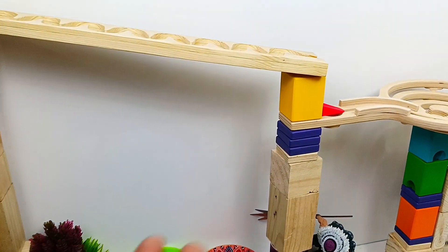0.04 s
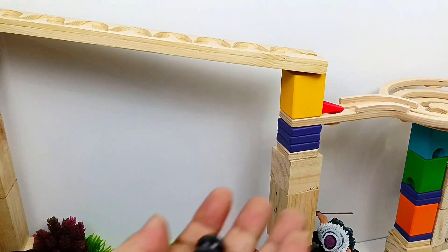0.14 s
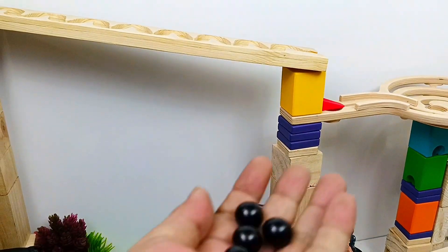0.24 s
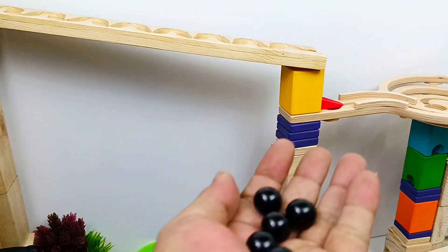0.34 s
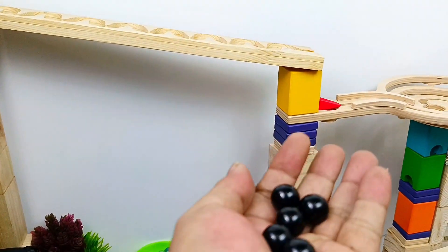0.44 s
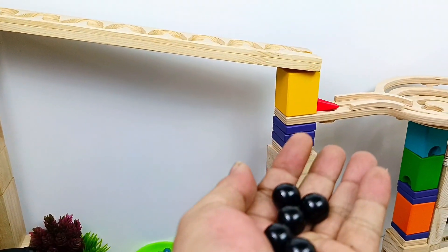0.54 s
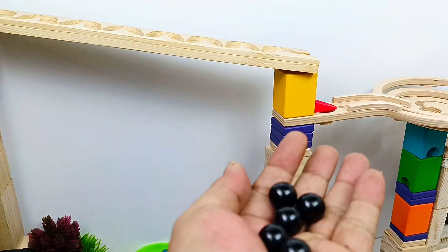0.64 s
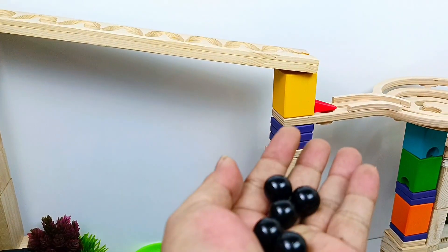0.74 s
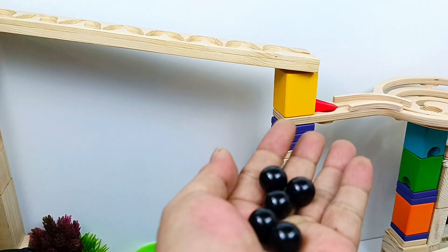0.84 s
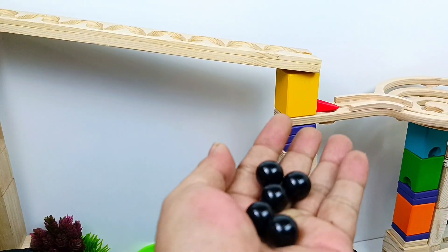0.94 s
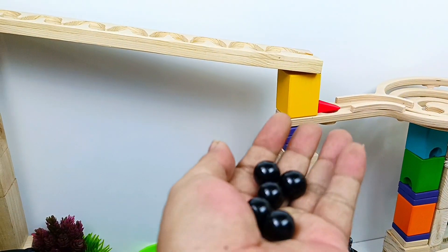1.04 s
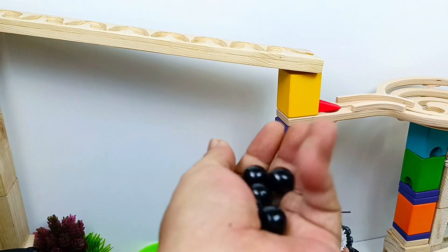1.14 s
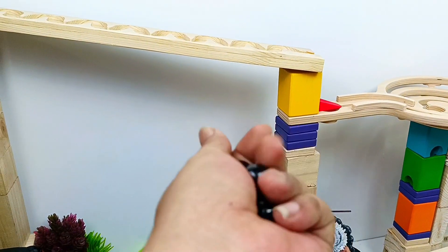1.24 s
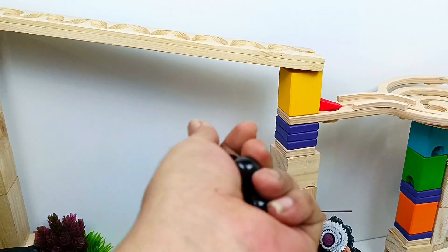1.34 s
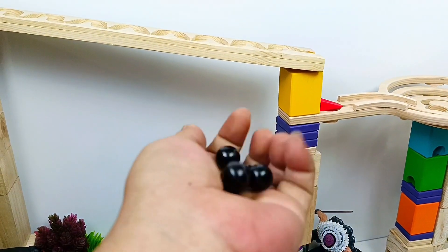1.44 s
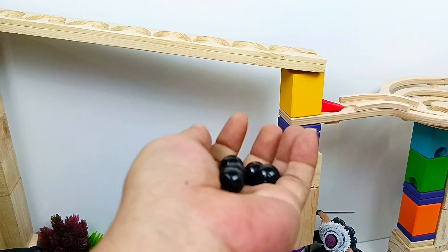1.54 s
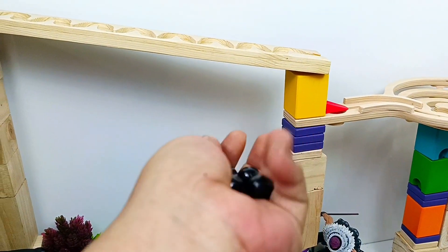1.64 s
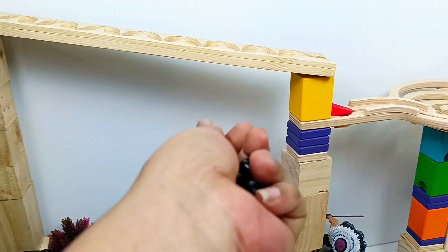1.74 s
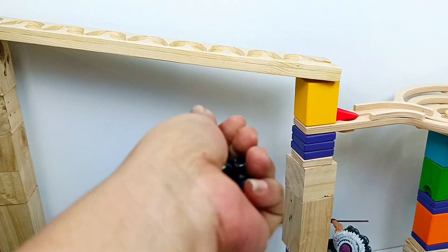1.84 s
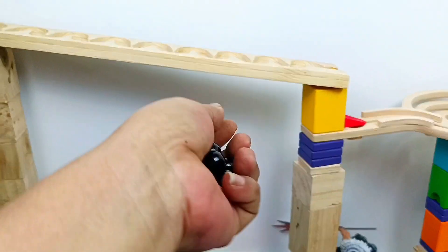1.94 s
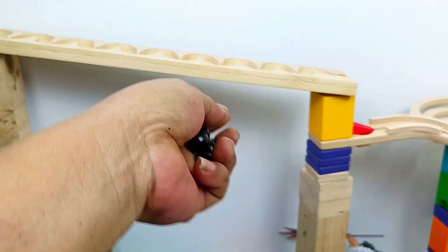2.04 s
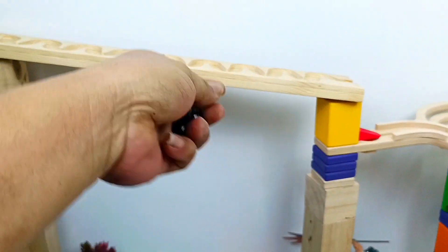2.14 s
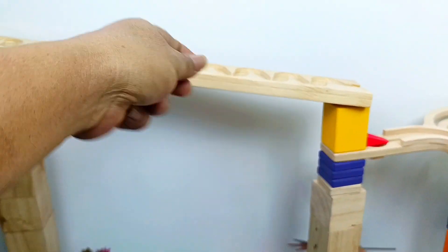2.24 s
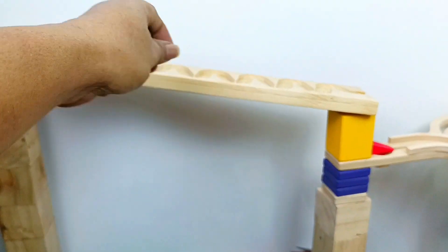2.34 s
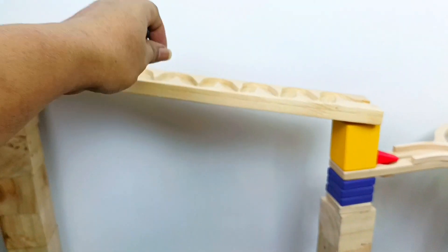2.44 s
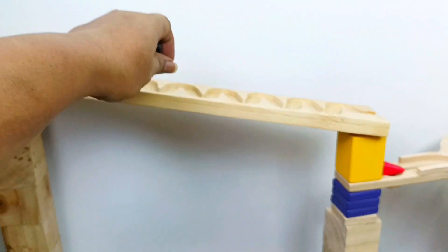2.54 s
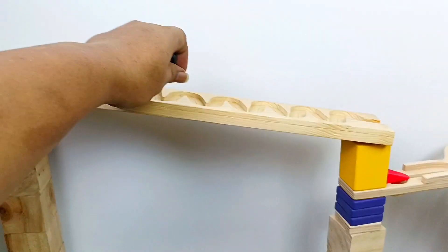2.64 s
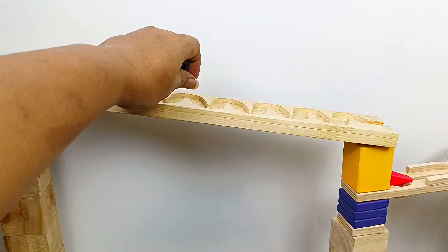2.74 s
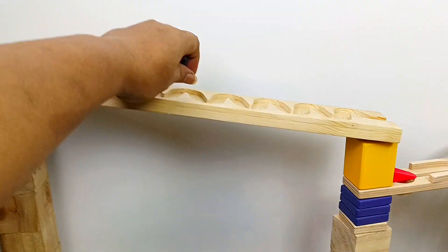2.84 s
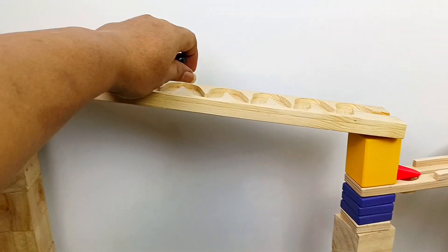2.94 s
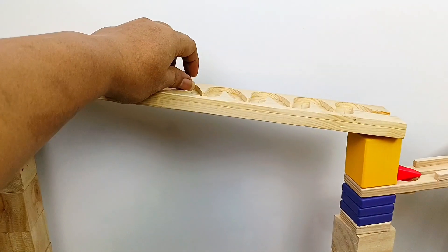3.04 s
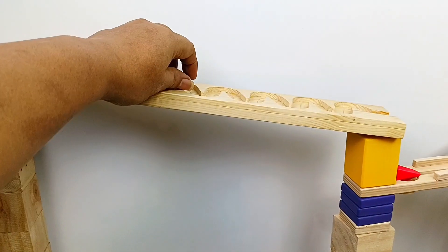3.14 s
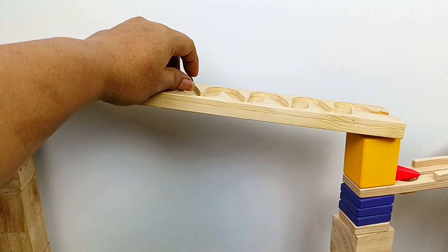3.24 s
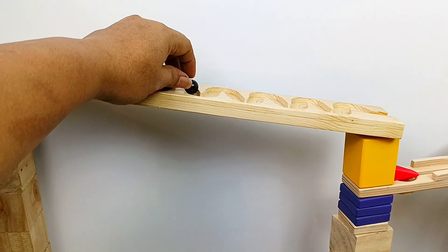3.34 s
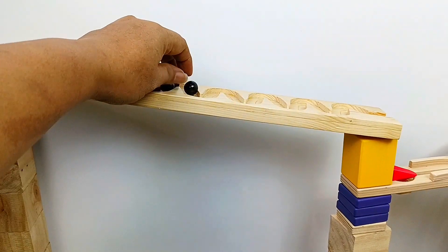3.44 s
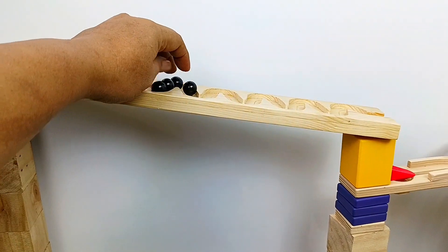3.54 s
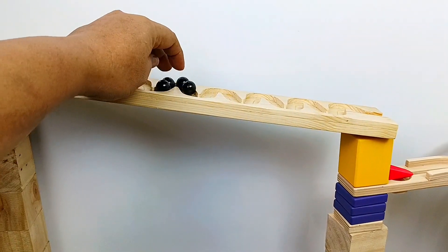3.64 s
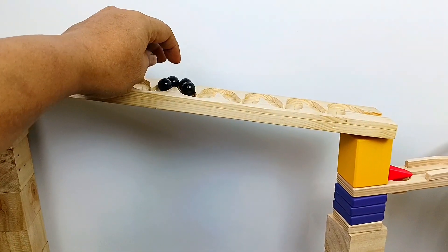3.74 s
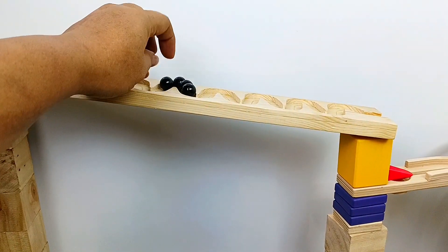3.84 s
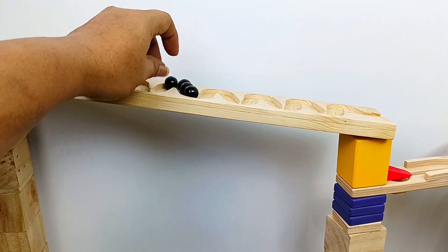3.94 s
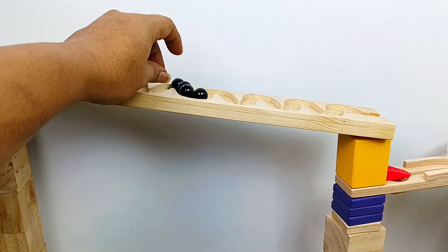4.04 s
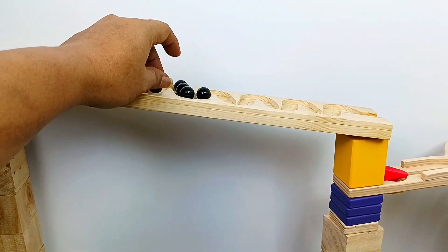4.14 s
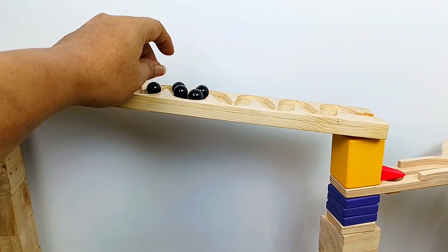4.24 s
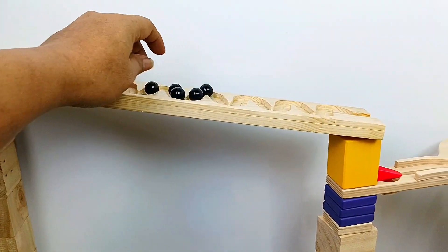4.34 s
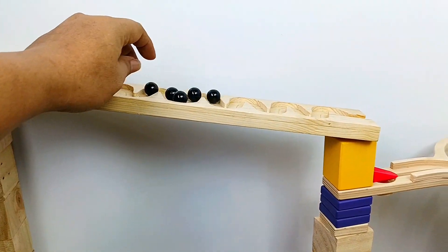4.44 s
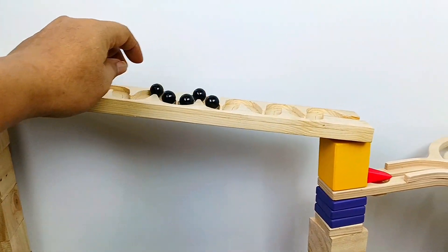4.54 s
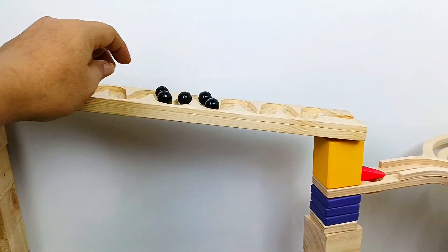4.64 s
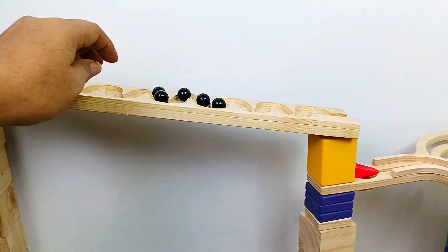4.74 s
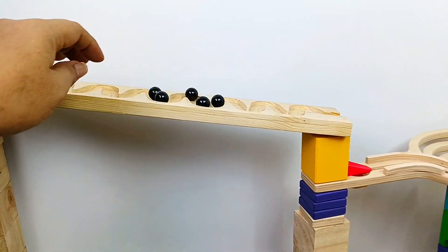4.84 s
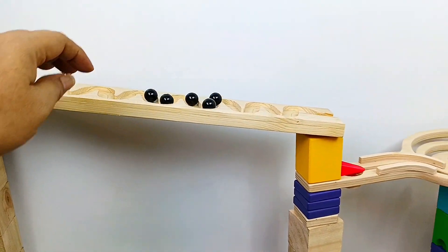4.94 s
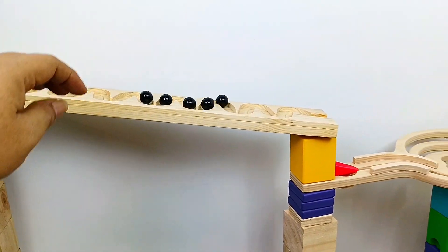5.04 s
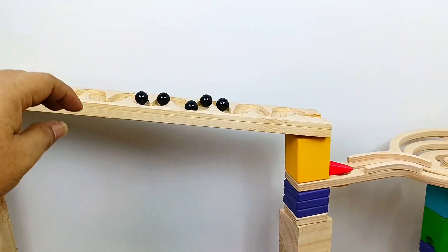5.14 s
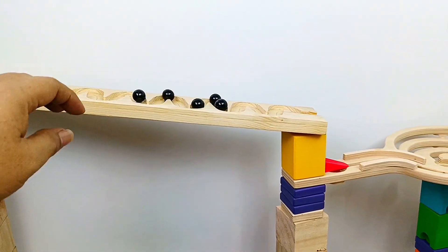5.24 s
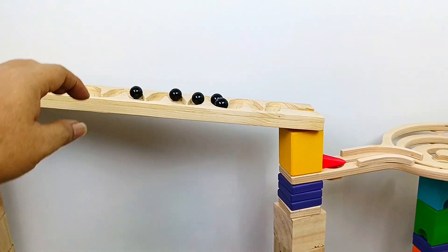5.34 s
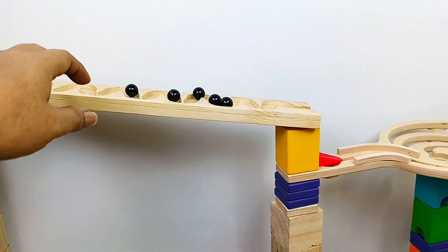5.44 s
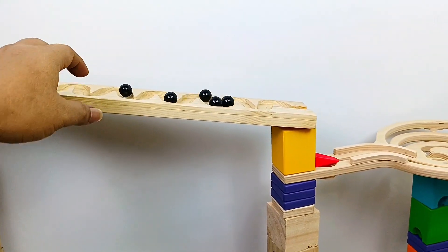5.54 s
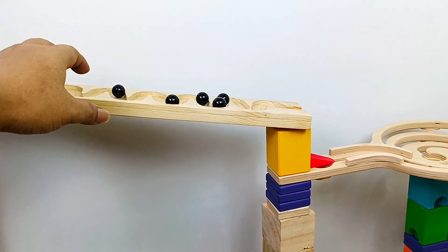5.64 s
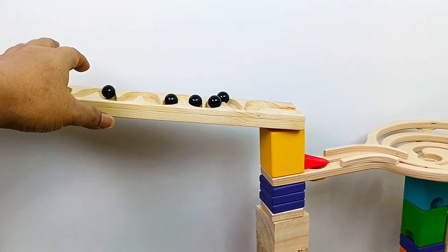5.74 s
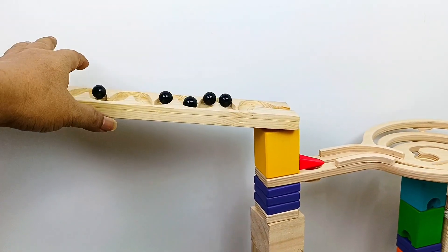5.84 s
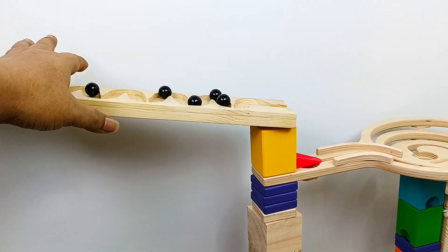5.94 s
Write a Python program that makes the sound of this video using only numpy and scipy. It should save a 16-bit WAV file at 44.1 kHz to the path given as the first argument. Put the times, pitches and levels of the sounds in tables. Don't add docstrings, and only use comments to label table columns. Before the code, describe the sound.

A quiet small room with faint, slightly uneven air hush, heard close through a handheld phone. Right at the start, hard glass marbles clack brightly together in a palm, a rapid burst dying within 0.15 s. A smaller patter follows at 0.43-0.62 s, then near quiet. At 1.4 s comes a sharp click with a few lighter ones; from 1.64 to 1.77 s the closing fingers make a crisp, dense rattle, trailing into sparse ticks until 2.1 s. A faint airy swell passes around 2.45 s. At 3.17 s the marbles spill onto a wooden ramp: a loud, hollow, ringing clatter, dense until 3.6 s, with a clear glass click at 3.84 s. Another cluster of woody knocks lands at 4.27 s, a duller one at 4.69 s, then irregular, mostly weakening taps and faint rolling over ridges continue to the end at 6 s. Soft low handling thumps come at 5.65 and 5.8 s.

```python
import sys
import numpy as np
from scipy import signal
from scipy.fft import rfft, irfft
from scipy.io import wavfile
from scipy.ndimage import uniform_filter1d

SR = 44100
rng = np.random.default_rng(int(sys.argv[2]) if len(sys.argv) > 2 else 0)


def inscribe(sig):
    pcm = np.round(np.clip(np.atleast_2d(sig).T, -1, 1) * 32767)
    wavfile.write(sys.argv[1], SR, pcm.astype(np.int16))


def voltage_ratio(decibels):
    exponent = np.asarray(decibels, float) / 20
    return 10 ** exponent


N = 263718

# start in seconds, peak in dB, hardness as treble in dB.
DROPS = [(3.1655, -22, -6), (3.1872, -22.5, -5.5), (3.1972, -24.5, -8), (3.238, -29, -2.5),
         (3.2495, -31.5, -4), (3.2795, -24, -4), (3.311, -31.5, 1), (3.3189, -32, -5.5), (3.3459, -30, -7),
         (3.3801, -26, -9), (3.4254, -25.5, -12), (3.4576, -38, -4), (3.4765, -26.5, -4),
         (3.5318, -29.5, -2), (3.5438, -27.5, -5.5), (3.5927, -26, -20), (3.6431, -40.5, -22),
         (3.7111, -52, -12), (3.7444, -33.5, -12), (3.7504, -33, -12), (3.7757, -32.5, -12),
         (3.9399, -38.5, -22), (3.9714, -38.5, -22)]
# start in seconds, peak in dB, hardness as treble in dB.
RIDGE_HITS = [(4.2697, -30, -7), (4.2891, -29.5, -4), (4.32, -33.5, -4.5), (4.3584, -41.5, -3),
              (4.398, -49.5, -4), (4.4364, -37, -17), (4.531, -50.5, -21), (4.566, -46, -1.5),
              (4.576, -43, -4), (4.669, -37, -15), (4.679, -40, -12), (4.6902, -33.5, -13),
              (4.6976, -29, -23.5), (4.8149, -39, -35), (4.949, -42.5, -8), (5.0486, -47, -18),
              (5.078, -47, -1), (5.102, -47.5, -7.5), (5.1459, -45, -15), (5.1873, -47, -21),
              (5.2282, -40.5, -19), (5.2345, -50, -4), (5.2536, -43.5, -18), (5.323, -36.5, -9.5),
              (5.3412, -41, -10), (5.3784, -51, -4), (5.422, -56, 4), (5.483, -45.5, -6.5),
              (5.5967, -42.5, -13), (5.619, -41.5, -5), (5.66, -44, -9), (5.6887, -51, -10),
              (5.7091, -49.5, -5), (5.74, -46.5, -13), (5.769, -56.5, -19), (5.8079, -44.5, -9.5),
              (5.8583, -52, -12), (5.907, -51, -12), (5.9238, -44, -15.5)]


def evened(x):
    return x / np.sqrt(np.mean(x ** 2) + 1e-20)


def read(points, hz):
    f, value = np.transpose(points)
    return np.interp(np.log(hz + 1), np.log(f + 1), value)


def over_time(points):
    return np.interp(np.arange(N) / SR, *np.transpose(points))


def follow(points):
    return voltage_ratio(np.interp(np.arange(N) / SR, *np.transpose(points), -150, -150))


def ring(x, hz, width):
    r = np.exp(-np.pi * width / SR)
    w = 2 * np.pi * hz / SR
    return signal.lfilter([0, np.sin(w)], [1, -2 * r * np.cos(w), r * r], x)


def colour(x, points):
    return irfft(rfft(x) * voltage_ratio(read(points, np.fft.rfftfreq(N, 1 / SR))), N)


def band(x, low_hz, high_hz, order=2):
    edges_hz = [low_hz, min(high_hz, .45 * SR)]
    return signal.sosfilt(signal.butter(order, edges_hz, "bp", fs=SR, output="sos"), x)


def grit(per_s, spread_db):
    sign = rng.choice([-1., 1.], N)
    size = rng.exponential(1, N)
    chance = rng.random(N)
    return sign * voltage_ratio(spread_db * np.minimum(size, 4)) * (chance < per_s / SR)


def wander(count, per_s):
    knots = rng.standard_normal((count, 200))
    return np.array([np.interp(np.arange(N) * per_s / SR, np.arange(200), k) for k in knots])


def patchy(x, patchy_db):
    z = signal.stft(x, nperseg=512)[2]
    patches = rng.standard_normal(z.shape[1:])
    patches = evened(uniform_filter1d(uniform_filter1d(patches, 5, 0), 8, 1))
    return signal.istft(z * voltage_ratio(patchy_db * patches), nperseg=512)[1][:, :N]


def hush():
    # time in seconds, level in dB.
    hush_level = [(0, -65), (.4, -64), (0.551, -67.5), (1.2, -65), (1.9, -67), (3.1, -63), (3.302, -65),
                  (4.5, -68.5), (5.98, -66.5)]
    # frequency in Hz, density in dB per Hz.
    hush_colour = [(15, -52.5), (25, -41.5), (55, -13.5), (77, -26), (135, -12.5), (280, -6), (422, -5.5),
                   (483, -8.5), (809, -10), (1510, -13), (2040, -8.5), (3700, -31), (4240, -24),
                   (5270, -39.5), (7710, -29.5), (15200, -50), (16500, -66.5)]
    # time in seconds, level in dB.
    draught_level = [
        (0.0, -57.5),
        (0.31, -60.5),
        (2.27, -60),
        (2.45, -54.5),
        (3.15, -63),
    ]
    # frequency in Hz, width in Hz, level in dB.
    hums = [
        (99, 19, -75.5),
        (161.4, 3.8, -79.5),
    ]
    # frequency in Hz, left-right coherence from 0 to 1.
    likeness = [(60, 0.92), (240, 0.94), (950, 0.93), (3770, 0.93), (15000, 0.99)]
    a, b = rfft(rng.standard_normal((2, N)))
    same = np.clip(read(likeness, np.fft.rfftfreq(N, 1 / SR)), -1, 1)
    pair = irfft([a, same * a + np.sqrt(1 - same ** 2) * b], N)
    air = evened(colour(pair, hush_colour)) * voltage_ratio(over_time(hush_level) + 4.5)
    draught = colour(pair[:, ::-1], [(900, -54.5), (1350, 0.0), (2200, -5.0), (2900, -9.0),
                                     (4500, -22.5), (9000, -42.5)])
    air += evened(draught) * follow(draught_level) * voltage_ratio(-2.5)
    hum = sum(voltage_ratio(db) * evened(ring(ring(pair, hz, w), hz, w)) for hz, w, db in hums)
    return patchy(air + hum, patchy_db=2) * voltage_ratio(.6 * wander(count=1, per_s=8.3))


def bumps():
    # start in seconds, level in dB, frequency in Hz, length in seconds.
    pushes = [
        (0.01, -60.5, 69.6, 0.17),
        (1.505, -63, 45, 0.051),
        (2.834, -50.5, 424.4, 0.13),
        (3.815, -55.5, 51.3, 0.15),
        (4.68, -54.5, 135, 0.053),
        (5.65, -37, 94.6, 0.013),
        (5.659, -42.5, 99, 0.03),
        (5.77, -38.5, 66.3, 0.035),
        (5.804, -38.5, 72, 0.023),
        (5.832, -57, 62.8, 0.15),
    ]
    out = np.zeros(N)
    for s, db, hz, length in pushes:
        t = np.arange(round(length * SR)) / SR
        push = voltage_ratio(db) * np.sin(2 * np.pi * hz * t) * np.hanning(len(t)) ** 1.48
        part = out[round(s * SR):][:len(t)]
        part += push[:len(part)]
    return out


def room(x, build_s=0.016):
    # frequency in Hz, reverberation time t60 in seconds.
    decay = [(300, 0.8), (1500, 1), (4000, 0.92), (8000, 0.69), (14000, 0.51)]
    taps = np.zeros((2, SR // 2))
    at = np.arange(60, SR // 2 - 20, 10) + rng.integers(0, 10, (2, (SR // 2 - 71) // 10))
    np.put_along_axis(taps, at, rng.choice([-1., 1.], at.shape), 1)
    taps = taps[0] + 0.4 * taps[1] * np.array([[1], [-1]])
    hz, t, z = signal.stft(taps, SR, nperseg=128)
    z = z * voltage_ratio(-60 * t / read(decay, hz)[:, None]) * (1 - 0.026 * np.exp(-t / build_s))
    tail = signal.istft(z, SR, nperseg=128)[1]
    return signal.fftconvolve(x[None], tail / np.linalg.norm(tail[0]), axes=1)[:, :N]


def shine(sway_db=5.0):
    # time in seconds, level in dB.
    shine_level = [(3.16, -75), (3.17, -53), (3.22, -55), (3.3, -55), (3.37, -65), (3.5, -60), (3.54, -62),
                   (3.65, -73), (3.74, -83), (4.265, -88), (4.275, -52), (4.33, -57), (4.42, -62),
                   (4.5, -82), (4.9, -80), (5.3, -77.5), (5.65, -77), (5.98, -82)]
    # frequency in Hz, width in Hz, level in dB.
    high_modes = [(3600, 100, 4), (3855, 90, 7.5), (4580, 100, -2), (4870, 93, -2), (5460, 170, -7),
                  (5860, 70, -2.5), (6830, 92, -17), (7340, 90, -9), (7900, 140, -3.5), (9280, 180, -29.5),
                  (10650, 250, -28)]
    grain = grit(per_s=2600, spread_db=2.5)
    sway = wander(count=len(high_modes), per_s=22)
    total = np.zeros(N)
    for k, (hz, w, db) in enumerate(high_modes):
        mode = ring(ring(grain, hz, w), hz, 1.5 * w)
        total += voltage_ratio(db + sway_db * sway[k]) * evened(mode)
    return follow(shine_level) * evened(total)


def sing():
    # time in seconds, level in dB.
    song_level = [(3.16, -64), (3.2, -38.5), (3.35, -46.5), (3.5, -48), (3.59, -34.5), (3.7, -56),
                  (3.85, -57.5), (4.2, -64.5), (4.3, -54), (4.55, -56), (4.8, -61), (5.1, -58),
                  (5.3, -59.5), (5.55, -58.5), (5.7, -60), (5.98, -56)]
    # frequency in Hz, width in Hz, level in dB.
    strong_modes = [(1295, 32, -1), (1371, 46, -2.5), (2064, 148, 1.5), (2858, 210, -5), (3870, 45, -19),
                    (4620, 63, -24.5), (381.5, 35, -11)]
    grain = grit(per_s=3000, spread_db=3.5)
    sway = wander(count=len(strong_modes), per_s=10)
    total = np.zeros(N)
    for k, (hz, w, db) in enumerate(strong_modes):
        mode = ring(ring(grain, hz, 1.4 * w), hz, 1.4 * w)
        total += voltage_ratio(db + 4.8 * sway[k]) * evened(mode)
    return follow(song_level) * evened(total)


def cracks(crack_db=-14, ridge_crack_db=-5.5, t60=0.049):
    s, db, treble_db = np.transpose([*DROPS, *RIDGE_HITS])
    on_ridge = np.arange(len(s)) >= len(DROPS)
    strikes = np.zeros(N)
    strikes[np.round(s * SR).astype(int)] = voltage_ratio(db + treble_db + crack_db + ridge_crack_db * on_ridge)
    level = signal.lfilter([1], [1, -voltage_ratio(-60 / (t60 * SR))], strikes)
    return colour(level * rng.standard_normal(N), [
        (1500, -27), (3300, 14), (5300, 1), (6300, -1), (6900, 3.5), (7400, -6), (8000, 2),
        (9000, -5), (15000, -15)])


def clinks(waver_db=4, wobble=1.0, rise_s=0.0013):
    # start in seconds, level in dB, frequency in Hz, decay time t60 in seconds.
    single_rings = [(1.308, -62, 5850, .2), (1.364, -46, 4290, .03), (1.397, -34, 2850, 0.02),
                    (1.4, -30.5, 3600, 0.014), (1.402, -53, 2750, .2), (1.403, -51, 3230, .1),
                    (1.431, -52, 2900, 0.24), (1.492, -36.5, 3990, 0.017), (1.571, -49, 4450, 0.039),
                    (1.824, -39, 3290, 0.032), (2.283, -53.5, 6220, .026), (2.287, -56, 5570, 0.027),
                    (2.292, -62, 5900, 0.036), (3.167, -43, 6830, .03), (3.24, -36, 456, 0.13),
                    (3.382, -23, 813, 0.045), (3.749, -33, 2275, 0.059), (3.752, -35.5, 1910, 0.059),
                    (3.753, -46, 5350, 0.046), (3.871, -50.5, 324, 0.071), (4.272, -46, 5570, .03),
                    (4.289, -48, 4850, .06), (4.29, -35.5, 2980, 0.1), (4.692, -54, 5540, 0.058),
                    (4.843, -43, 4510, .02), (4.952, -52, 4620, .05), (4.956, -54, 3900, 0.27),
                    (5.083, -62, 4600, 0.04), (5.236, -54, 4720, 0.064), (5.322, -52, 5490, .025),
                    (5.325, -59, 4950, 0.1), (5.326, -53, 3600, .05), (5.426, -56.5, 4400, 0.067),
                    (5.47, -50, 370, 0.11), (5.487, -63, 3920, 0.062), (5.619, -37, 3010, 0.032),
                    (5.62, -44.5, 3620, 0.055), (5.62, -54, 4600, .04), (5.69, -65, 5750, .05),
                    (5.81, -62, 3920, .08)]
    out = np.zeros(N)
    t = np.arange(SR // 4) / SR
    waver = wander(count=1, per_s=36)[0]
    for s, db, hz, t60 in single_rings:
        shake = waver[round(hz) * 25 + np.arange(len(t)) * 6] * np.minimum(t / .01, 1)
        level = voltage_ratio(db - 60 * t / t60 + waver_db * shake) * np.minimum(t / rise_s, 1)
        phase = 2 * np.pi * hz * t + wobble * min(hz / 2500, 1) * shake[::-1]
        part = out[round(s * SR):][:len(t)]
        part += (level * np.sin(phase))[:len(part)]
    return out


def ramp(knock_db=-12, roll_db=-38, place_db=4, drop_blow_s=.002, ridge_blow_s=.005):
    # frequency in Hz, level in dB, decay time t60 in seconds.
    plank_modes = [(244, -25, 0.081), (342, -21, 0.091), (385, -5, 0.06), (411.6, 0, 0.073),
                   (462.3, 1.5, 0.061), (625, -33, 0.036), (813, 6, 0.059), (1063, 6, 0.033),
                   (1243, -9, 0.076), (1294, -8, 0.14), (1369, -6.5, 0.098), (1387, -3.5, 0.043),
                   (1490, -6.5, 0.18), (1643, -8.5, 0.078), (1803, 2.5, 0.039), (2043, 7, 0.0095),
                   (1994, -4, 0.08), (2085, -1.5, 0.081), (2121, 1, 0.019), (2293, -3.5, 0.054),
                   (2338, -5.5, 0.098), (2444, -18, 0.05), (2493, -9, 0.076), (2570, -5.5, 0.029),
                   (2662, -7.5, 0.08), (2830, -7, 0.065), (2880, -4.5, 0.037), (2919, -6.5, 0.076),
                   (2960, -28, 0.029), (3470, 1, 0.022), (3608, 5, 0.039), (3857, 5.5, 0.033),
                   (3854, 1, 0.048), (4250, -8, 0.016), (4600, 5.5, 0.021), (4850, 1.5, 0.02),
                   (5400, -12, 0.025)]
    # time in seconds, level in dB.
    roll_level = [(3.162, -49), (3.2, -29.5), (3.3, -33), (3.37, -36), (3.46, -36.5), (3.52, -36.5),
                  (3.62, -37), (3.73, -60.5), (3.8, -48), (4.05, -57), (4.261, -58), (4.31, -42.5),
                  (4.5, -56.5), (4.8, -54), (4.951, -61), (5.05, -52), (5.25, -57), (5.45, -53),
                  (5.57, -64), (5.66, -53), (5.8, -69), (5.98, -55.5)]
    part_edges = [1100, 2430, 3250]
    lean_db = -0.18 * (over_time(roll_level) + 50)
    roll_share_db = (-8 + lean_db, 0, -2, -31 + lean_db)
    grain = follow(roll_level) * evened(grit(per_s=2500, spread_db=2.5))
    place = wander(count=len(plank_modes), per_s=14)
    spot = rng.standard_normal((len(DROPS) + len(RIDGE_HITS), len(plank_modes), 7))
    s, db, hard_db = np.transpose([*DROPS, *RIDGE_HITS])
    dropped = np.arange(len(s)) < len(DROPS)
    blow_s = np.where(dropped, drop_blow_s, ridge_blow_s)[:, None]
    bass_db = np.where(dropped, -9, -18.5)
    knock_share_db = (bass_db, 0, 13 + hard_db, hard_db + 0.5 * ~dropped)
    out = np.zeros(N)
    for k, (hz, mode_db, t60) in enumerate(plank_modes):
        part = np.searchsorted(part_edges, hz)
        drive = grain * voltage_ratio(roll_db + roll_share_db[part] + 2.7 * place[k])
        arrival_s = s[:, None] + blow_s * abs(spot[:, k, 1:4]) * [.3, 1, 2]
        at = np.round(arrival_s * SR).astype(int)
        size = voltage_ratio(db + knock_db + knock_share_db[part] + place_db * np.clip(spot[:, k, 0], -2, 1))
        drive[at] += size[:, None] * np.sign(spot[:, k, 4:]) * [.7, .6, .4]
        out += voltage_ratio(mode_db) * ring(drive, hz, 2.2 / min(t60, .11, 250 / hz))
    return band(out, 250, 4700)


def cupped(s):
    # time in seconds, hollow share in dB.
    cup = [
        (0, -8),
        (.6, -7.5),
        (1.37, 3.5),
        (1.39, -15),
        (1.63, -7),
        (1.67, -3),
        (2.1, -1.5),
        (3.13, 1),
        (3.2, -23),
    ]
    return np.interp(s, *np.transpose(cup))


def fizz_tails(rise_s=0.00096, hollow_db=-1):
    # start in seconds, level in dB, hold in seconds, decay time t60 in seconds.
    bursts = [(0, -34, 0.0092, 0.23), (.429, -53, .0042, .14), (0.535, -54, .0077, 0.22),
              (1.33, -77, .03, .1), (1.359, -61, 0.014, 0.032), (1.396, -43, .0064, .11),
              (1.433, -47, 0.027, 0.39), (1.636, -51, .0064, .88), (1.718, -40.5, 0.056, 0.11),
              (1.816, -61, .0078, .39), (2.064, -58, 0.025, 0.067), (2.117, -58, 0.011, 0.5),
              (3.16, -68, .032, 0.82), (3.406, -56.5, .031, 0.23), (3.745, -68, 0.061, .11),
              (3.835, -40.5, 0.0045, 0.054), (3.857, -60, 0.033, 0.58), (3.959, -50, .0044, 0.085),
              (4.139, -58, 0.0054, 0.14), (4.247, -67, 0.0073, 0.043), (4.266, -57, 0.026, 0.083),
              (4.839, -55, 0.074, 0.15), (5.597, -72, .01, .04), (5.923, -74, .008, .04)]
    # frequency in Hz, density in dB per Hz.
    fizz_colour = [(2650, -43), (4500, -16.5), (5560, -6.5), (6100, -9), (7980, 2), (9870, -10),
                   (12300, -17), (15100, -19), (16000, -20.5)]
    ticks = grit(per_s=9000, spread_db=2.5)
    bright = evened(colour(ticks, [(3000, -59.5), *fizz_colour]))
    hollow = evened(band(ticks, 2930, 4640))
    out = np.zeros(N)
    for s, db, lasts, t60 in bursts:
        at = slice(round(s * SR), round((s + 0.51) * SR))
        t = np.arange(len(out[at])) / SR
        level = voltage_ratio(db - 60 * np.maximum(t - lasts, 0) / t60) * np.minimum(t / rise_s, 1)
        out[at] += level * (bright[at] + voltage_ratio(cupped(s) + hollow_db) * hollow[at])
    return out


def bounces(loss_db=-2.5, top_db=-8, dulls_db=-7.5):
    # start in seconds, peak in dB, first gap in seconds, ratio of successive gaps, contacts.
    runs = [
        (.4308, -32, .0045, .88, 5),
        (.499, -32, .0068, .64, 5),
        (.5232, -25, .0027, .84, 8),
        (1.5712, -37, .0022, 1, 3),
    ]
    contacts = []
    for s, db, gap, share, count in runs:
        for k in range(int(count)):
            worn = k * 5 / count
            contact_s = s + gap * sum(share ** np.arange(k))
            contacts.append((contact_s, db + loss_db * worn, top_db + dulls_db * worn))
    return contacts


def clicks(echo_s=0.00048, echo=0.99):
    # low edge in Hz, high edge in Hz.
    click_body = [
        (3480, 4960),
        (6100, 8920),
        (10500, 15100),
    ]
    # start in seconds, peak in dB, top sparkle
    # in relative dB.
    palm_clicks = [(.0019, -18, -11), (.0127, -20, -19), (.0262, -8, -9), (.0358, -8, -17),
                   (.0455, -15, -12), (.051, -15, -18), (.0597, -20, -18), (.0706, -25, -19),
                   (.0782, -31, -13), (.089, -30, -15), (.0986, -31, -17), (.1109, -37, -15),
                   (.1172, -36, -12), (.1269, -34, -19), (.5514, -33, -28), (.6002, -32, -13),
                   (.6139, -41, -5), (.6212, -45, -13), (1.1269, -55, -25), (1.3075, -61, -25),
                   (1.3659, -43, -24), (1.3832, -51, -43), (1.3973, -23, -6), (1.4027, -32, -11),
                   (1.4348, -40, -15), (1.4522, -39, -20), (1.4917, -35, -10), (1.5151, -38, -10),
                   (1.6378, -33, -8), (1.6417, -22, 2), (1.6668, -37, -3), (1.6909, -39, -7),
                   (1.7011, -25, -10), (1.7145, -22, -10), (1.7229, -29, -14), (1.7287, -29, -15),
                   (1.7326, -34, -16), (1.7353, -24, -13), (1.7428, -29, -12), (1.7492, -23, -9),
                   (1.7511, -35, -12), (1.7599, -23, -10), (1.7705, -27, -13), (1.8231, -31, -16),
                   (1.8301, -37, -21), (1.9039, -39, -15), (1.9604, -46, -18), (2.0651, -40, 4),
                   (2.0693, -43, 0), (2.0822, -40, -6), (2.0892, -45, -22), (2.1181, -31, -1),
                   (2.1248, -40, -5), (3.1094, -48, 0)]
    # start in seconds, peak in dB, top sparkle in relative dB.
    far_clicks = [(3.1657, -44, -12), (3.1866, -41, 1), (3.1897, -36, -11), (3.2412, -39, -15),
                  (3.2815, -41, -12), (3.2855, -40, -3), (3.3829, -45, -16), (3.41, -42, -11),
                  (3.4399, -39, -9), (3.4787, -47, -23), (3.5345, -46, -7), (3.7494, -50, -15),
                  (3.782, -52, -20), (3.8363, -25, -8), (3.8718, -50, -17), (3.899, -47, -12),
                  (3.9276, -43, -15), (3.9628, -36, -9), (4.0775, -53, -26), (4.1402, -46, -15),
                  (4.2705, -45, -11), (4.2885, -44, -6), (4.6903, -60, -20), (4.843, -39, -3),
                  (4.8463, -40, -15), (4.893, -49, -21), (4.9363, -56, -22), (5.0778, -58, -15),
                  (5.3266, -66, -22), (5.6008, -58, -16)]
    rows = [*palm_clicks, *bounces()]
    rows += [(s, db + 3.5, top_db) for s, db, top_db in far_clicks]
    drive = np.zeros((3, N + 200))
    luck = rng.uniform(-0.83, 1, (len(rows), 4))
    for (s, db, top_db), (a, b, c, d) in zip(rows, luck):
        at = max(round((s - .0005) * SR), 0)
        size = voltage_ratio([[db + cupped(s)], [db], [db + top_db]])
        late = at + np.round(echo_s * SR * np.array([0, 1 + .35 * a, 2.2 + .8 * c])).astype(int)
        drive[:, late] += size * [.6, echo * (1 + .2 * b), .4 * d]
    out = np.zeros(N)
    for ticks, (low_hz, high_hz) in zip(drive, click_body):
        out += band(ticks[:N], low_hz, high_hz, order=3) * SR / (2 * (high_hz - low_hz))
    return voltage_ratio(-2.5) * out


def scene():
    # time in seconds, level in dB.
    click_room = [(0, -13), (0.299, -10), (1.2, -12), (1.7, -9.5), (2.2, -13), (3.15, -7), (3.6, -26),
                  (3.8, -15.5), (4.9, -11)]
    glass = clicks()
    fizz = fizz_tails()
    wood = ramp() + clinks() + cracks() + sing() + shine()
    away = voltage_ratio(over_time(click_room))
    wet = room(away * glass + voltage_ratio(-8.5) * fizz + voltage_ratio(-7.0) * wood)
    tails = patchy(fizz + wet, patchy_db=1.3)
    return glass + wood + tails + hush() + bumps()


def low_pass(x):
    return signal.sosfilt(signal.butter(12, 17010, fs=SR, output="sos"), x)


def record(dry, ports_db=-13, smear_s=.012, self_db=-88):
    # frequency in Hz, difference between the ports in dB.
    port_gap = [(30, 13), (70, 9), (140, -1), (600, 3), (2000, -1), (5000, 0), (9000, 1), (14000, -2)]
    smear = rng.standard_normal(3000) * np.exp(-np.arange(3000) / (smear_s * SR))
    other = signal.oaconvolve(colour(dry.mean(0), port_gap), smear / np.linalg.norm(smear))[:N]
    other *= np.tanh(2 * wander(count=1, per_s=25)[0])
    ports = dry + voltage_ratio(ports_db) * other * np.array([[1], [-1]])
    ports = ports + voltage_ratio(self_db) * band(rng.standard_normal(N), 13000, 16500)
    ports = signal.sosfilt(signal.butter(4, 42, "hp", fs=SR, output="sos"), ports)
    edge = sum(share * signal.firwin(511, hz, window=("kaiser", 9), fs=SR)[None]
               for hz, share in [(16000, .92), (16900, .08)])
    return low_pass(signal.oaconvolve(ports, edge, "same"))


dry = scene()
out = record(dry)
inscribe(out)
```